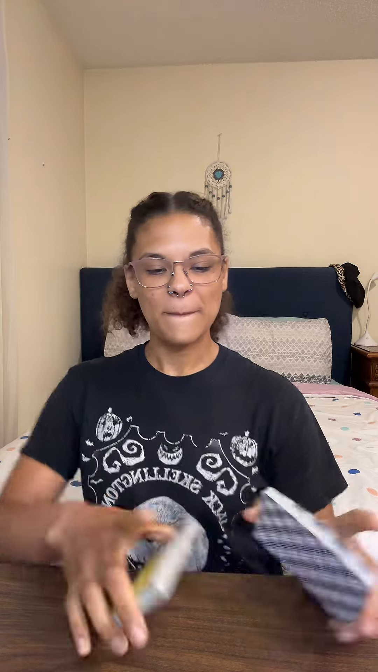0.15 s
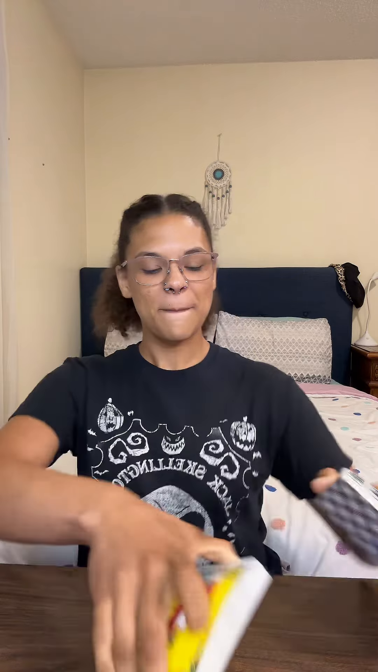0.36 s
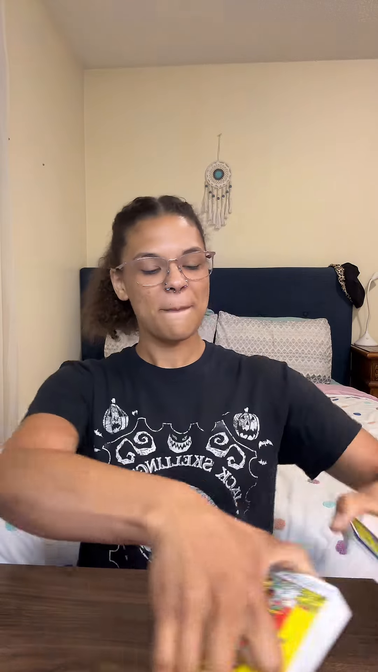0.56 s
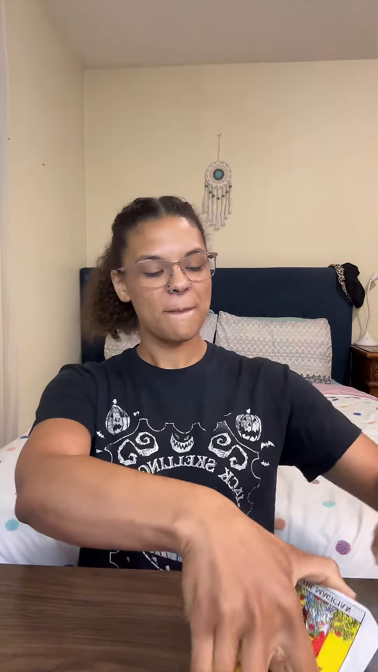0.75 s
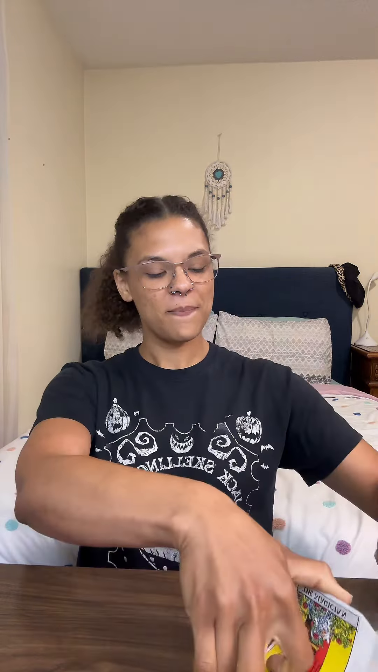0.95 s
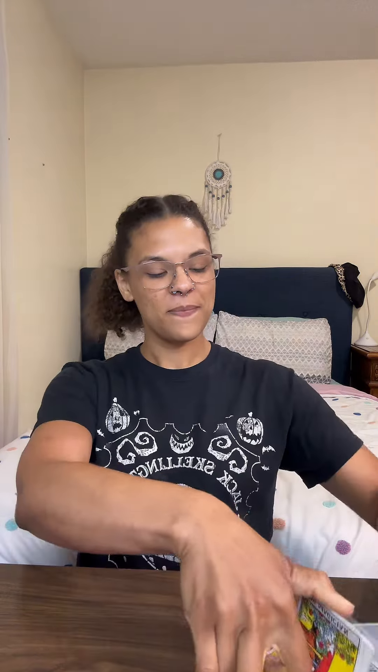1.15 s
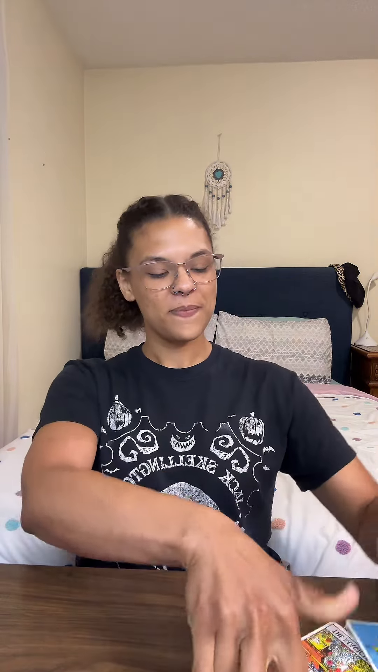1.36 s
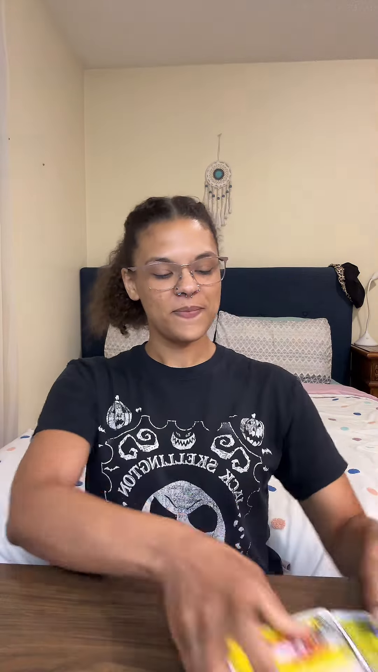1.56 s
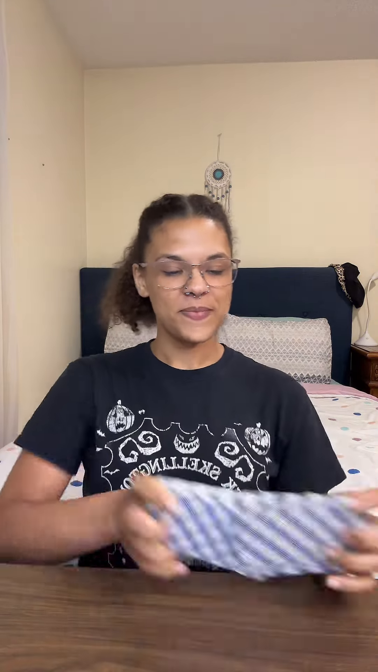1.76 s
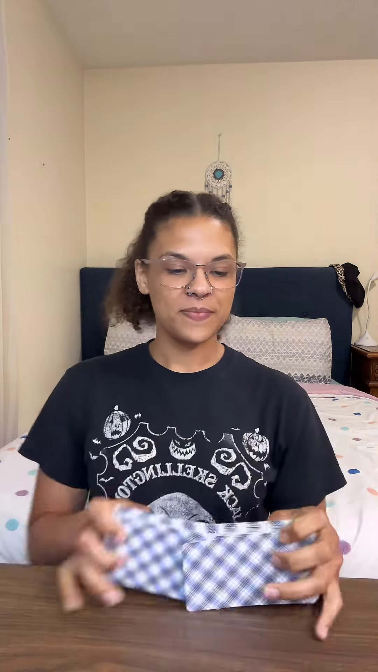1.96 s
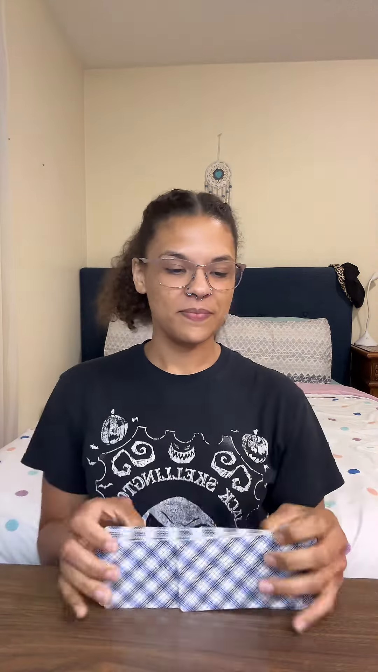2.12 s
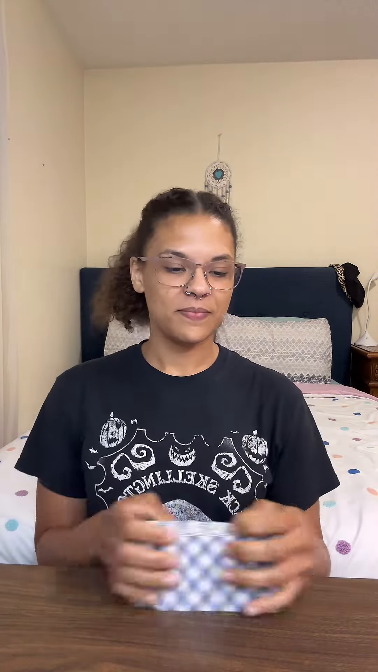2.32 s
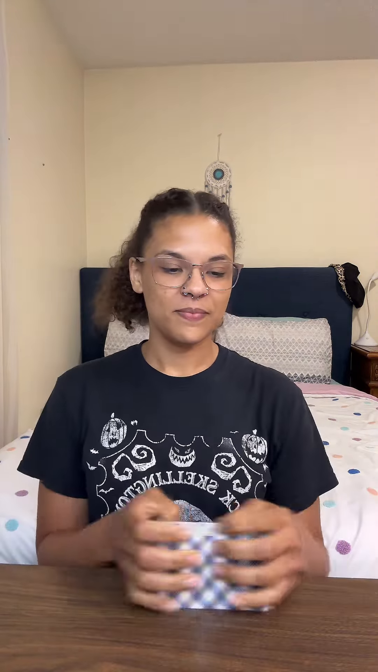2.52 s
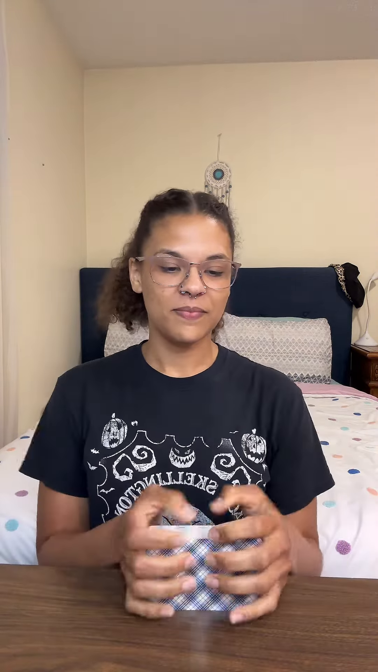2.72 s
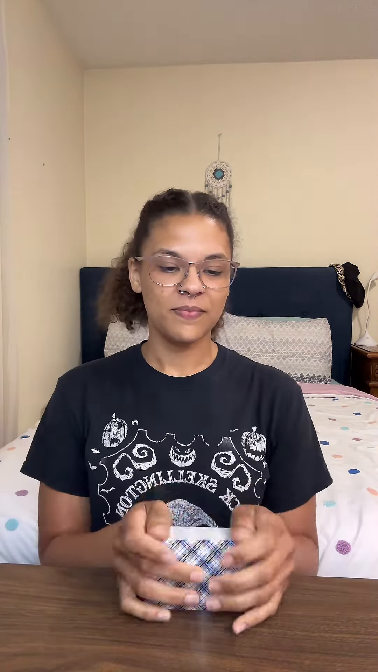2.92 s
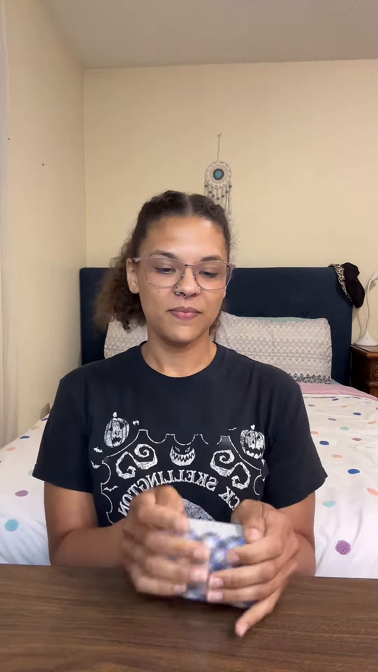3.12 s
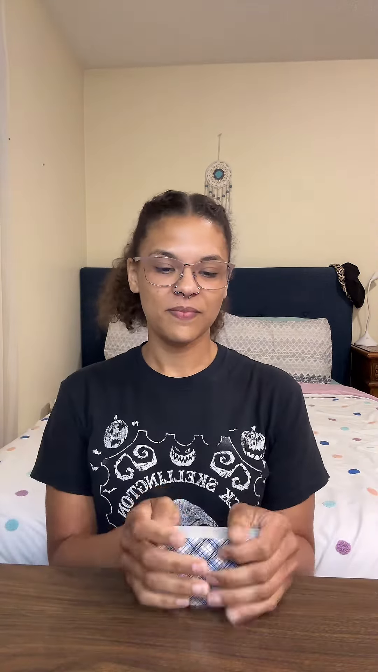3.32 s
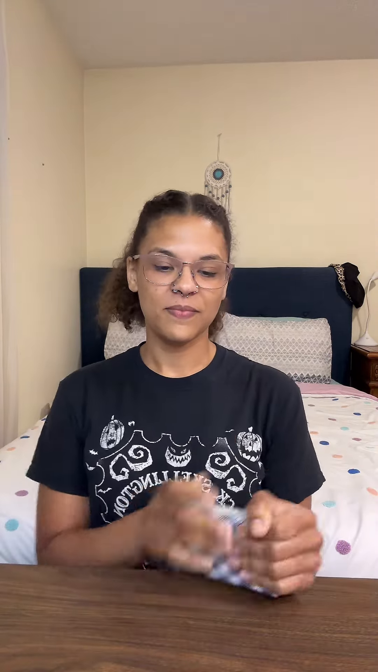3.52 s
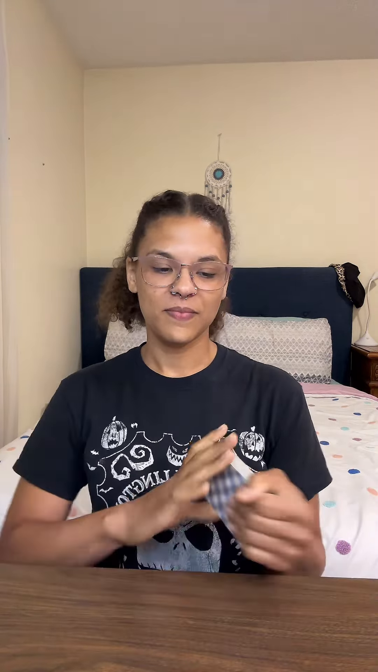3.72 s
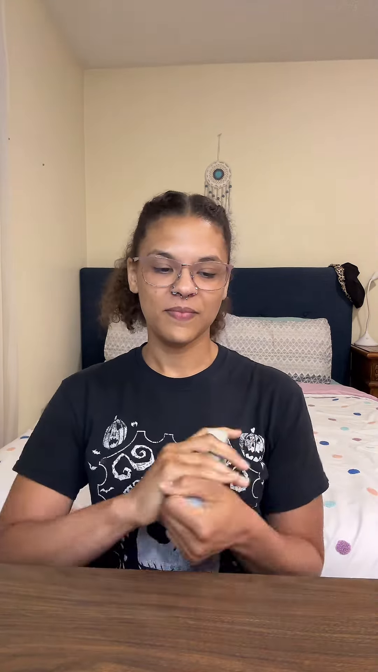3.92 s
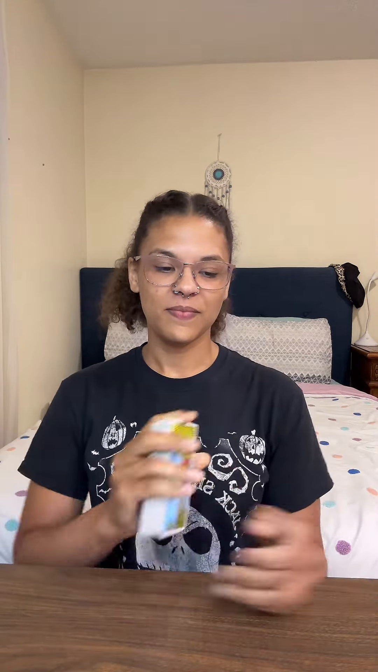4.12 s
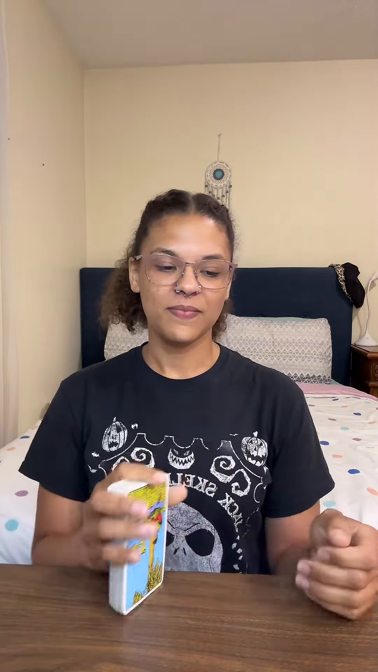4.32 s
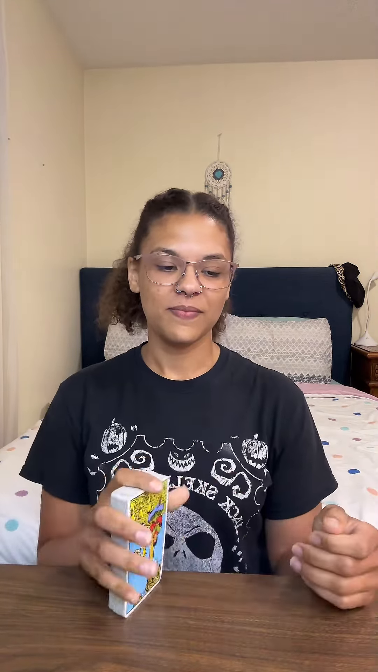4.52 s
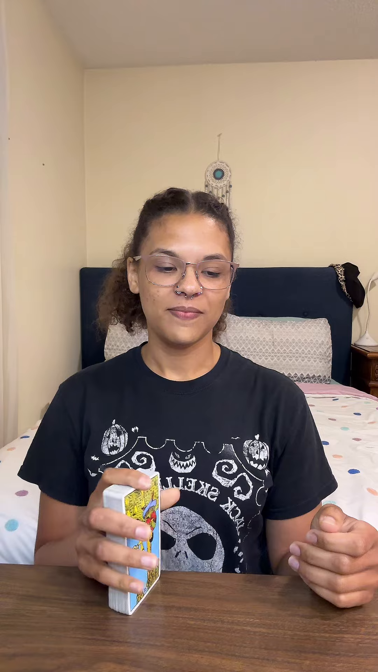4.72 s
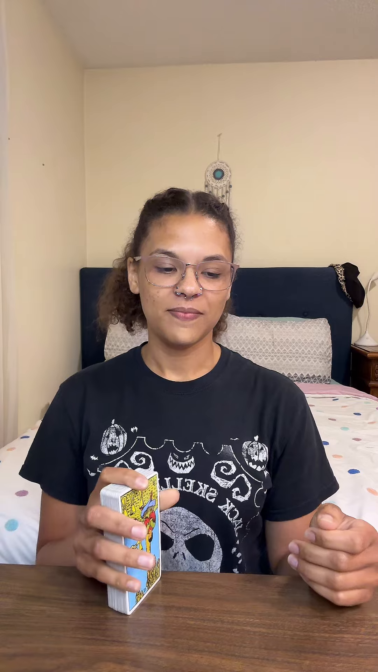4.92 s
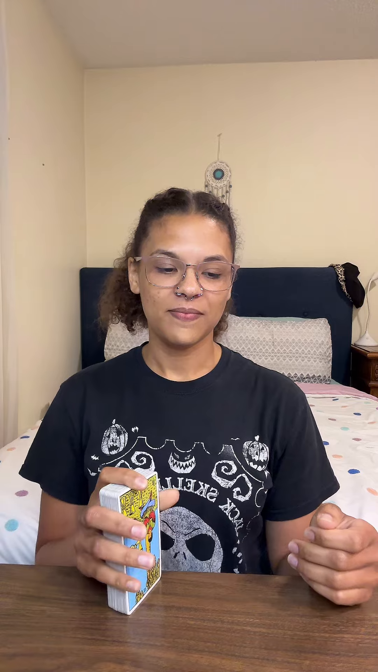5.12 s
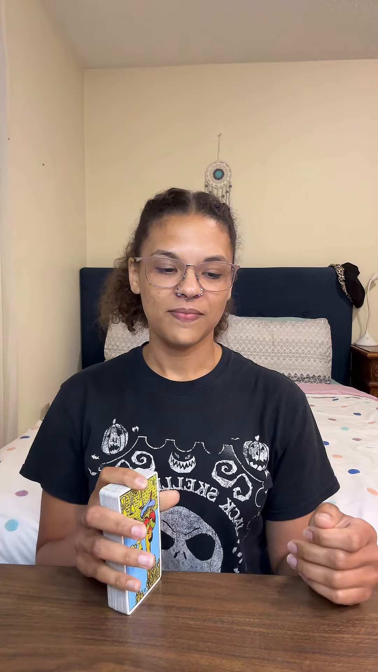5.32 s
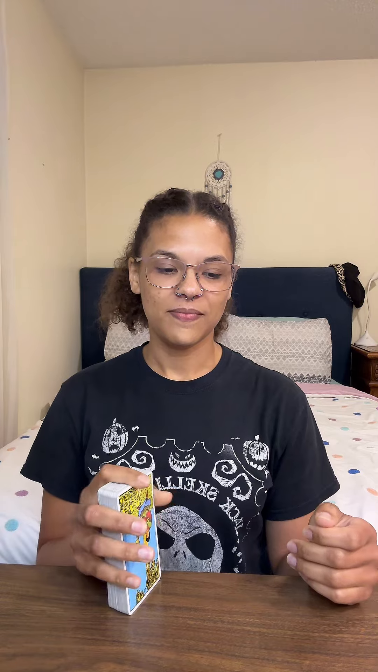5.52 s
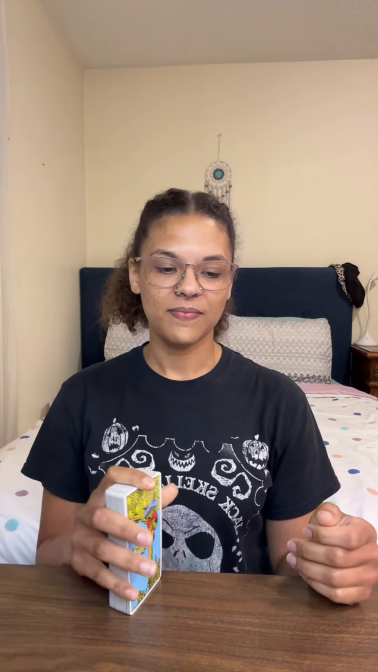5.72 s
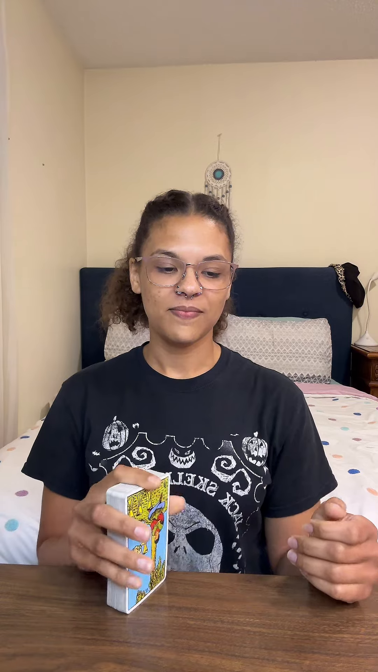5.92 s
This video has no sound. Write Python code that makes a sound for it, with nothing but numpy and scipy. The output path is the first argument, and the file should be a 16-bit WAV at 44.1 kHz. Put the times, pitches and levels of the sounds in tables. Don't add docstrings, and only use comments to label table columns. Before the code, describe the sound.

A deck of large cards is riffled in a fast crackling run, pushed together, then knocked square on a wooden table in a quiet bedroom.

```python
import sys
import numpy as np
from scipy import signal
from scipy.fft import rfft, irfft, next_fast_len
from scipy.io import wavfile
from scipy.ndimage import uniform_filter1d

SR = 44100
rng = np.random.default_rng(int(sys.argv[2]) if len(sys.argv) > 2 else 0)


def pcm_store(signal):
    levels = np.round(np.clip(np.atleast_2d(signal), -1, 1) * 32767)
    wavfile.write(sys.argv[1], SR, levels.astype(np.int16).T)


def linear_from_db(decibels):
    return 10 ** (np.asarray(decibels, float) / 20)


N = 262836


def rms_one(x):
    return x / np.sqrt(np.mean(x ** 2) + 1e-20)


def in_time(rows):
    s, *columns = np.transpose(rows)
    return [np.interp(np.arange(N) / SR, s, column) for column in columns]


def at_hz(points, hz):
    point_hz, value = np.transpose(points)
    return np.interp(np.log(hz), np.log(point_hz), value)


def drift(rate_hz):
    r = np.exp(-80 * np.pi * rate_hz / SR)
    white = rng.standard_normal(N // 40 + 2002)
    slow = signal.lfilter([1], [1, -2 * r, r * r], white)[2000:]
    return np.interp(np.arange(N) / 40, np.arange(len(slow)), rms_one(slow))


def band(x, low, high):
    return signal.sosfilt(signal.butter(2, [low, high], "band", fs=SR, output="sos"), x)


def resonate(x, modes):
    out = 0
    for k, (hz, width, level_db) in enumerate(modes):
        r = np.exp(-np.pi * width / SR)
        b = (1 - r * r) / 2 * np.array([1, 0, -1])
        a = [1, -2 * r * np.cos(2 * np.pi * hz / SR), r * r]
        out = out + (-1) ** k * linear_from_db(level_db) * signal.lfilter(b, a, x)
    return out


def coloured(x, spectrum):
    size = next_fast_len(N)
    hz = np.maximum(np.arange(size // 2 + 1) * SR / size, 1)
    inside = (hz > spectrum[0][0]) & (hz < spectrum[-1][0])
    return rms_one(irfft(rfft(x, size) * linear_from_db(at_hz(spectrum, hz)) * inside, size)[:N])


def gestures(rows, *rest_db):
    t, rows = np.arange(0, N + 32, 32) / SR, np.array(rows)
    late = t - rows[:, :1]
    rise_s, fall_s = np.abs(rows[:, 1:2]), np.abs(rows[:, 2:3])
    shape_db = -20 * np.where(late < 0, -late / rise_s, late / fall_s)
    power = linear_from_db(2 * rows[:, 3:].T) @ linear_from_db(2 * shape_db)
    power = power + linear_from_db(2 * np.array(rest_db))[:, None]
    return [np.interp(np.arange(N) / SR, t, np.sqrt(p)) for p in power]


# (frequency [Hz], level [dB per Hz])
HOUSE_AIR = [(21, -28), (35, -2.5), (91, -10), (124, -11), (217, -21), (254, -17), (393, -20.5), (434, -24),
             (904, -30.5), (1040, -31.5), (4000, -41), (5200, -79), (8800, -120)]
# (frequency [Hz], width [Hz], level [dB])
APPLIANCES = [(57.6, 3.8, -55), (121.5, 8.4, -57)]
# (time [s], level [dB])
FAR_PIPE = [
    (4.72, -91),
    (4.82, -54.5),
    (5.12, -55.5),
    (5.18, -90),
]


def house():
    air = linear_from_db(-55.5 + 0.55 * drift(11.0)) * coloured(rng.standard_normal(N), HOUSE_AIR)
    hum = 0
    for hz, width, level_db in APPLIANCES:
        hum = hum + linear_from_db(level_db) * rms_one(resonate(rng.standard_normal(N), [(hz, width, 0)]))
    pipe_hz = 269
    pipe_db, = in_time(FAR_PIPE)
    return air + hum + linear_from_db(pipe_db) * np.sin(2 * np.pi * pipe_hz * np.arange(N) / SR)


# (frequency [Hz], width [Hz], level [dB])
TABLE_MODES = [(117, 37, -1), (175, 33, -2), (229, 40, -2.5), (320.5, 33, -0.5), (404, 68, 2.5),
               (506, 88, -5.5)]
# (frequency [Hz], width [Hz], level [dB])
STACK_BODY_MODES = [(570, 270, -1), (1143, 450, 1), (1670, 260, -9.5)]
# (frequency [Hz], width [Hz], level [dB])
STACK_EDGE_MODES = [(3157, 940, 5.5), (4470, 1300, 7), (5340, 1700, 0.5)]


def slaps(rows, t60, push_t60, rise_s, click, dull_hz, fizz_hz, trim_db, card, gloss_db=-30):
    rows, t, out = np.array(rows), np.arange(3072) / SR, np.zeros(N + 3072)
    dying, push_dying = linear_from_db(-60 * t / t60), linear_from_db(-60 * t / push_t60)
    white = rng.standard_normal((len(rows), len(t))) * (1 - np.exp(-t / rise_s))
    white[:, 8] -= click
    fizz = band(band(white * dying, 5400, fizz_hz), 4300, 0.91 * fizz_hz)
    gloss = band(band(white * dying, 12300, 16500), 12000, 17000)
    fizz = fizz + linear_from_db(gloss_db) * gloss
    dull = signal.sosfilt(signal.butter(4, dull_hz, fs=SR, output="sos"), white)
    burst, push = dull * dying, dull * push_dying
    bend = 1 + 0.1 * rng.uniform(-1.1, 1, len(rows))
    ring = np.array([np.interp(t * b, t, r) for b, r in zip(bend, resonate(burst, card))])
    layers = [
        band(ring, 1100, 4200),
        band(resonate(push, TABLE_MODES), 58, 900),
        band(resonate(push, STACK_BODY_MODES), 360, 1700),
        band(band(resonate(burst, STACK_EDGE_MODES), 2700, 6200), 2400, 6600),
        fizz]
    levels = rows[:, [1, 2, 2, 3, -1]]
    total = 0
    for k, layer in enumerate(layers):
        loudest = np.sqrt(uniform_filter1d(layer ** 2, size=132).max(axis=1, keepdims=True))
        total = total + layer / loudest * linear_from_db(levels[:, k:k + 1] + trim_db[k])
    lead_s = .0005
    for s, sound in zip(rows[:, 0] - lead_s, total):
        out[round(s * SR):][:len(t)] += sound
    return out[:N]


# (frequency [Hz], width [Hz], level [dB])
FLAT_CARD_MODES = [(1150, 400, -4.5), (1680, 390, 2.5), (2900, 1100, 1), (3600, 600, -5)]
# (time [s], card ring [dB], weight [dB], edge snap [dB], fizz [dB])
FINGERS = [(.1545, -64, -55, -66, -64), (.1686, -69, -64, -72, -62), (.2286, -64, -45, -58, -64),
           (.281, -60, -50, -62, -64), (.3229, -60, -50, -58, -53), (.482, -57, -60, -62, -69),
           (.5659, -55, -56, -62, -63), (.601, -50, -48, -48, -57), (.672, -68, -56, -72, -74),
           (.8515, -64.5, -63, -68.5, -72), (1.8, -50, -58, -50, -46), (1.892, -56, -62.5, -60, -59),
           (1.96, -60, -64, -64, -61), (2.0405, -48, -55, -40, -49), (3.242, -72, -70, -74, -68),
           (1.703, -52, -58, -56, -70), (4.2, -64, -55, -70, -72), (4.2186, -62, -61, -70, -64),
           (5.4689, -67, -58, -74, -80), (5.745, -68, -58, -80, -85), (5.812, -70, -52, -80, -85)]


def handling():
    return slaps(FINGERS, t60=0.015, push_t60=0.025, rise_s=0.001, click=2.5, dull_hz=11990,
                 fizz_hz=15000, trim_db=[-5, -10, -8, -3, -4], card=FLAT_CARD_MODES)


# (delay [s], level [dB])
WALL_ECHOES = [
    (.0088, -15.5),
    (0.0163, -20),
]
# (frequency [Hz], time to fall 60 dB [s])
ROOM_DECAY = [(100, 0.36), (300, 0.32), (1000, 0.39), (3000, 0.35), (6000, 0.14), (12000, 0.06)]
# (frequency [Hz], level [dB])
ROOM_LEVEL = [(100, -3), (400, -5), (1000, -6), (2400, -13.5), (6000, -12.5), (12000, -15)]


def bedroom(x):
    t, edges = np.arange(SR // 2) / SR, 70 * 2 ** np.arange(0, 8.1, .5)
    tail = np.zeros(len(t))
    onset = 1 - np.exp(-(t / 0.0029) ** 2)
    for low, high in zip(edges, edges[1:]):
        hz = np.sqrt(low * high)
        decay = at_hz(ROOM_DECAY, hz)
        unit_energy = np.sqrt(2 * np.log(1000) / decay / SR)
        dying = rng.standard_normal(len(t)) * linear_from_db(-60 * t / decay) * unit_energy
        tail += linear_from_db(at_hz(ROOM_LEVEL, hz)) * band(dying * onset, low, high)
    echoes = np.zeros(len(t))
    for s, level_db in WALL_ECHOES:
        echoes[round(s * SR)] = linear_from_db(level_db)
    return x + signal.fftconvolve(x, tail + band(echoes, 680, 5500))[:N]


# (peak time [s], 20 dB rise [s], 20 dB fall [s], rub [dB], fine hiss [dB])
STROKES = [(.262, .1, .17, -59, -66), (.486, .03, .05, -60, -75), (.612, .02, .12, -60, -69),
           (.85, .4, .4, -71, -80), (.99, .03, .02, -59, -55), (1.625, .05, .1, -44, -59),
           (1.775, .05, .07, -47, -50), (1.812, .05, .12, -48, -51.5), (1.95, .2, .25, -62, -72),
           (2.47, .06, .2, -48, -59), (2.54, .14, .04, -44, -51), (2.612, .03, .05, -50, -66),
           (2.715, .025, .06, -46, -56), (2.742, .06, .05, -38, -53), (2.78, .05, .25, -54, -66),
           (3.14, .05, .33, -66, -74), (3.78, .35, .04, -66, -74), (4.014, .04, .4, -61.5, -77),
           (4.2, .12, .05, -70, -65), (4.325, .04, .1, -68, -65), (4.39, .1, .1, -65, -63),
           (4.435, .06, .04, -68, -65), (4.62, .04, .12, -58, -74), (5.758, .06, .05, -66, -86),
           (5.93, .3, .3, -74, -82), (2.045, .005, .06, -62, -57), (2.102, .003, .1, -40, -56),
           (3.07, .003, .06, -47, -76), (3.462, .008, .15, -34, -56), (1.035, .02, .09, -38, -42)]
# (frequency [Hz], level [dB per Hz])
RUB_SPECTRUM = [(300, -22.5), (450, -4), (874, -4.5), (1200, -5), (1700, 1), (7000, -14.5), (9100, -38.5),
                (15400, -120)]
# (frequency [Hz], level [dB per Hz])
HISS_SPECTRUM = [(2940, -43.5), (5000, -0.5), (6530, -4.5), (7670, -3.5), (9190, 1.5), (11500, -14.5),
                 (14700, -9.5), (16000, -12)]


def sliding():
    rub, hiss = gestures(STROKES, -83.5, -92)
    sizes = linear_from_db(2 * np.minimum(rng.exponential(1, (2, N)), 4))
    grain = sizes * rng.standard_normal((2, N))
    grip = linear_from_db(1.3 * drift(40))
    sheen = linear_from_db(-8.0) * rms_one(band(band(grain[0], 12300, 16500), 12000, 17000))
    rubbing = coloured(grain[0], RUB_SPECTRUM) * rub * linear_from_db(-3.0)
    hissing = (coloured(grain[1], HISS_SPECTRUM) + sheen) * hiss * linear_from_db(-2.0)
    return grip * (rubbing + hissing)


# (peak time [s], 20 dB rise [s], 20 dB fall [s], level [dB])
PRESSES = [(.27, .1, .3, -48), (1.025, .02, .06, -45), (1.53, .1, .08, -34), (1.612, .02, .1, -32),
           (2.13, .04, .2, -37), (2.175, .02, .1, -37), (2.3, .15, .22, -41), (2.36, .06, .1, -41),
           (2.49, .05, .05, -50), (2.6, .06, .08, -52), (2.77, .05, .2, -32.5), (3.46, .06, .2, -29.5),
           (3.53, .04, .08, -35), (3.62, .1, .3, -48), (4.56, .06, .15, -32), (4.63, .03, .15, -42),
           (5.2, .1, .1, -58), (5.48, .04, .05, -55), (5.78, .06, .06, -55)]
# (frequency [Hz], width [Hz], level [dB])
LEG_MODES = [(71.5, 56, -5.5)]


def hands():
    press, = gestures(PRESSES, -63)
    press = np.hypot(press, run_of_cards(-21, 0))
    shaking = rms_one(resonate(rng.standard_normal(N), LEG_MODES + TABLE_MODES[:3]))
    return shaking * press * linear_from_db(-4.0 + 1.4 * drift(22))


# (frequency [Hz], width [Hz], level [dB])
RING_TICK_MODES = [(2150, 140, 1), (4420, 300, -6.5)]


def ring_tick(t60):
    late = np.arange(N) / SR - .601
    buzz = rng.standard_normal(N) * linear_from_db(-60 * np.abs(late) / t60) * (late > 0)
    return linear_from_db(-35) * resonate(buzz, RING_TICK_MODES)


# (frequency [Hz], width [Hz], level [dB])
BENT_CARD_MODES = [(1711, 190, -1.5), (2330, 140, 5.5), (2820, 240, -1), (3380, 390, -6)]
# (time [s], card ring [dB], weight [dB], edge snap [dB], fizz [dB])
FIRST_CARDS = [(0.9966, -43, -40.5, -32.5, -31.5), (1.0011, -39, -44, -36, -38.0),
               (1.014, -46, -48, -45, -38.0), (1.0176, -27, -30, -15.5, -19),
               (1.0221, -30, -24.5, -30, -33.0), (1.0262, -25.5, -35, -33, -39),
               (1.0496, -34.5, -39, -33, -34.5), (1.0797, -28.5, -32.5, -31.5, -40.0),
               (1.0828, -36.5, -32, -35.5, -42), (1.1069, -26.5, -30.5, -27.5, -34),
               (1.1151, -38.5, -52.5, -34, -36), (1.1296, -30.5, -44, -25.5, -35.0),
               (1.1325, -17.5, -22, -17, -27.5), (1.1414, -21.5, -30.5, -27, -28.5),
               (1.1492, -27.5, -32.5, -26.5, -32.5), (1.1713, -27.5, -23.5, -29, -34.5),
               (1.1828, -19.0, -24, -31.5, -29.5), (1.1941, -19.5, -18.5, -24.5, -28.5),
               (1.2083, -22.0, -35, -30, -30), (1.2158, -27.5, -34, -33, -32.5),
               (1.2218, -20, -22.5, -19.5, -29.5), (1.2269, -19.5, -28.5, -26.5, -34.5),
               (1.2375, -27.5, -26.5, -31.5, -32.0), (1.2491, -11, -20, -25, -28.5),
               (1.2494, -18, -21.5, -26, -27.5), (1.2542, -21, -39.5, -29.5, -29.5),
               (1.2709, -28.5, -34.5, -36, -39), (1.2791, -37.5, -31.5, -38.5, -35.0),
               (1.287, -18.5, -15.5, -16.5, -27.0), (1.297, -17.5, -28, -17, -22.5),
               (1.3027, -18, -21.5, -21.5, -29.0), (1.3142, -30.5, -31.5, -25, -40),
               (1.3168, -32, -37, -27.5, -33.5), (1.3332, -24.5, -34.5, -32.5, -39),
               (1.3384, -25.5, -26.5, -26, -32), (1.3421, -29, -20, -21.5, -35.0),
               (1.3588, -22, -18.5, -21, -33.5), (1.3652, -33.5, -32, -35.5, -32.0),
               (1.3697, -30, -26.5, -23, -31.5), (1.3961, -22, -30, -32, -39.5)]
# (time [s], card ring [dB], weight [dB], edge snap [dB], fizz [dB])
LAST_CARDS = [(1.415, -25.5, -20.5, -31, -39.5), (1.4311, -26, -32.5, -35.5, -43),
              (1.4387, -26.5, -16.5, -35, -40.0), (1.4448, -16.5, -17, -30, -34.5),
              (1.4463, -24.5, -26, -37, -39.0), (1.4519, -28, -35.5, -25, -26.5),
              (1.454, -21, -27, -40.5, -34), (1.4614, -20, -26.5, -38, -33), (1.4696, -23.5, -26, -31, -37),
              (1.4742, -32, -16.5, -29, -35), (1.4774, -22, -28, -27, -33), (1.4876, -21, -19, -36, -21),
              (1.4943, -17.5, -29.5, -34, -34), (1.4991, -23.5, -27, -28.5, -33),
              (1.5056, -27, -19, -30.0, -34.5), (1.5103, -14.5, -19.5, -33, -29.5),
              (1.5127, -25, -26, -29.5, -40.5), (1.5213, -16.5, -21, -31, -39.0),
              (1.5251, -17.5, -25, -16.5, -27.5), (1.5302, -33, -40.5, -33.5, -42.5),
              (1.5367, -25.5, -40, -35.5, -40.5), (1.5548, -20, -26, -23, -32.5),
              (1.5852, -34, -44, -24.5, -40), (1.5987, -22.5, -26.5, -31.0, -35.5)]


def riffle():
    first = slaps(FIRST_CARDS, t60=0.015, push_t60=0.0059, rise_s=0.0003, click=8.0, dull_hz=17000,
                  fizz_hz=16600, trim_db=[-2.5, -8.0, -3.0, -1.5, 0.5], card=BENT_CARD_MODES)
    last = slaps(LAST_CARDS, t60=0.015, push_t60=0.011, rise_s=0.0003597, click=7.2, dull_hz=9000,
                 fizz_hz=10200, trim_db=[-3.0, -8.0, -3.5, -6.0, -1.5], card=BENT_CARD_MODES, gloss_db=-3.0)
    return first + last


# (time [s], level [dB])
CARD_RUN = [(1.0, -45), (1.125, -43), (1.151, -31), (1.363, -22.5), (1.407, -32), (1.457, -21.5),
            (1.507, -22), (1.56, -29), (1.61, -33), (1.72, -59.5)]


def run_of_cards(offset_db, db_per_s):
    t, (run_db,) = np.arange(N) / SR, in_time(CARD_RUN)
    since = t - CARD_RUN[0][0]
    running = (since > 0) * (t < CARD_RUN[-1][0])
    return uniform_filter1d(linear_from_db(run_db + offset_db + db_per_s * since) * running, size=220)


# (time [s], 20 dB fall [s], flutter [dB], fine hiss [dB])
LOOSE_BURSTS = [
    (0.997, 0.48, -32.5, -40.5),
    (1.017, -0.01, -19.5, -23.5),
    (1.132, 0.0881, -16.5, -29),
    (2.099, -0.35, -45.5, -57.5),
    (2.2213, 0.1068, -20, -43),
    (2.261, 0.12, -26.5, -54),
    (2.289, 0.1362, -34.5, -58),
    (3.451, -0.0084, -14, -42),
    (3.466, 0.1238, -34, -57),
]


def flutter(per_s):
    rise_s = .002
    ticks, hiss = gestures([(s, rise_s, *rest) for s, *rest in LOOSE_BURSTS], -120, -120)
    ticks = np.hypot(ticks, run_of_cards(0, 0))
    hiss = np.hypot(hiss, run_of_cards(-5.5, -20))
    sizes = linear_from_db(2.5 * np.minimum(rng.exponential(1, N), 4)) * rng.choice([-1, 1], N)
    clicks = sizes * (rng.random(N) < per_s / SR) + 1e-18
    bent = np.arange(N) < 1.6 * SR
    ringing = resonate(clicks * bent, BENT_CARD_MODES)
    ringing = ringing + linear_from_db(-3.0) * resonate(clicks * ~bent, FLAT_CARD_MODES)
    ringing = ringing + linear_from_db(-8.5) * band(clicks, 3000, 7500)
    ringing = ringing + linear_from_db(-3.5) * resonate(clicks, STACK_BODY_MODES)
    air = coloured(rng.standard_normal(N) + 0.27 * rms_one(clicks), HISS_SPECTRUM)
    air += linear_from_db(-5.0) * rms_one(band(rng.standard_normal(N), 5500, 21000))
    return rms_one(band(ringing, 270, 7100)) * ticks * linear_from_db(-7.0) + air * hiss * linear_from_db(-3.5)


# (frequency [Hz], level [dB])
LEFT_SPOT = [(183, -34.5), (410, -40), (560, -31.5), (700, -28.5), (926, -26.5), (1050, -22), (1285, -24),
             (1785, -29.5), (2390, -22.5)]
# (frequency [Hz], level [dB])
MIDDLE_SPOT = [(124, -32.5), (180, -30), (235, -28), (280, -26), (320, -26), (400, -27), (560, -31.5),
               (830, -33), (1085, -24), (1292, -24.5), (1800, -25.5)]
# (frequency [Hz], level [dB])
RIGHT_SPOT = [(185, -26.5), (235, -27.5), (400, -30), (600, -27.5), (720, -21), (830, -27), (1040, -24),
              (1240, -21.5), (1790, -19.5), (2380, -14)]
# (time [s], level [dB], contact length [s], spot [0 left, 1 middle, 2 right])
TOP_CONTACTS = [(2.095, -6, 0.0066, 0), (2.103, 2.5, 0.002, 0), (2.11, 1.5, 0.003, 0),
                (2.127, -3.5, 0.0028, 0), (3.4154, -0.5, 0.0023, 1), (3.424, -5.5, 0.0029, 1),
                (3.449, -2, .002, 1), (3.465, -9.5, 0.0034, 1), (4.511, 1, 0.002, 2),
                (4.516, -7, 0.0026, 2), (4.537, -12, 0.0028, 2)]


def table_top():
    out, t = np.zeros(N + SR), np.arange(SR // 2) / SR
    cycles = 30
    for s, level_db, length, spot in TOP_CONTACTS:
        modes = [LEFT_SPOT, MIDDLE_SPOT, RIGHT_SPOT][round(spot)]
        hz, db = np.repeat(modes, 2, axis=0).T[:, :, None]
        strength, phase, split = rng.standard_normal((3, len(hz), 1))
        hz = hz * (1 + .05 * split)
        ring = linear_from_db(db + 2 * strength - 60 * t * hz / cycles) * np.sin(2 * np.pi * hz * t + phase)
        onset = 1 - np.exp(-(t / length * 2) ** 2)
        out[round(s * SR):][:len(t)] += linear_from_db(level_db - 2.0) * ring.sum(axis=0) * onset
    return out[:N]


# (time [s], card ring [dB], weight [dB], edge snap [dB], fizz [dB])
CORNER_KNOCKS = [
    (2.0973, -24.5, -26.5, -26, -42.5),
    (3.4156, -24, -26.5, -31, -47.5),
    (4.5108, -30, -25.5, -37, -45.5),
    (4.5127, -30, -21, -38, -50),
]


def knocks():
    return slaps(CORNER_KNOCKS, t60=0.014, push_t60=0.069, rise_s=0.0019, click=1.7, dull_hz=4170,
                 fizz_hz=11000, trim_db=[-3.0, -4.0, 0.5, -9.0, -11.5], card=FLAT_CARD_MODES)


# (time [s], card ring [dB], weight [dB], edge snap [dB], fizz [dB])
PUSHED_CARDS = [(2.219, -20.5, -33, -18, -44), (2.2207, -22, -30, -11.5, -38),
                (2.2222, -34, -30.5, -13.5, -36), (2.2252, -20, -33, -26, -29),
                (2.2467, -34, -24.5, -37, -50), (2.2562, -28, -29, -29, -48),
                (2.2604, -22, -37, -17.5, -20), (2.2637, -19, -28.5, -21.5, -42.0),
                (2.271, -24, -27.5, -21, -43), (2.2908, -30, -30, -17.5, -25), (2.2973, -23, -32, -24, -44),
                (2.3025, -42, -45, -21.5, -38), (2.3052, -31, -25.5, -24, -28),
                (2.3116, -21.5, -29.5, -20, -37), (2.3199, -30, -35, -36, -39.0),
                (2.3345, -23.5, -35, -27, -55), (2.4452, -40, -42, -49, -66.0), (2.454, -36, -41, -38, -68),
                (2.4697, -28.5, -31, -25, -64), (2.4955, -32.5, -49, -41, -50),
                (2.5167, -29, -41, -33, -42), (2.6151, -37, -36, -37, -62), (2.704, -41, -42, -56, -64.0),
                (2.7184, -35, -36, -34, -66), (2.7245, -46, -42, -35, -62), (2.7283, -38, -30.5, -48, -60),
                (2.7425, -31, -47, -33.5, -58), (2.7454, -22.5, -26, -27, -60),
                (2.8176, -40, -37, -36, -66), (2.8355, -41.5, -47, -61.5, -78),
                (3.0648, -43, -38, -41, -74.5), (3.0715, -44.5, -38.5, -46, -77.5),
                (3.0765, -38, -42, -47, -77.5), (3.0797, -38, -38, -42.5, -74.5),
                (2.1005, -33.5, -34.5, -32.5, -58)]


def squaring():
    return slaps(PUSHED_CARDS, t60=0.016, push_t60=0.031, rise_s=0.00048, click=5.5, dull_hz=6600,
                 fizz_hz=8603, trim_db=[0.0, -7.5, -2.5, -0.5, -5.0], card=FLAT_CARD_MODES)


# (time [s], card ring [dB], weight [dB], edge snap [dB], fizz [dB])
FLUSH_CARDS = [(3.4483, -13, -21.5, -4.5, -27.5), (3.4515, -13, -17, -17, -29),
               (3.4605, -28, -25.5, -28, -31.5), (3.7212, -52.5, -54, -61, -53.5),
               (3.7353, -55.5, -57.5, -63, -66), (4.55, -29, -33, -20, -55), (4.552, -17, -32, -27, -50),
               (4.5584, -20, -36, -36, -60), (4.561, -23, -32, -32, -61), (4.567, -29, -35, -30, -62)]


def settling():
    return slaps(FLUSH_CARDS, t60=0.013, push_t60=0.028, rise_s=0.00023, click=6.0, dull_hz=5130,
                 fizz_hz=8600, trim_db=[-2.5, -7.5, -2.5, -5.0, -2.0], card=FLAT_CARD_MODES)


# (peak time [s], 20 dB rise [s], 20 dB fall [s], level [dB])
THUMB_CREAKS = [(4.075, .02, .06, -67), (4.15, .04, .03, -71), (4.18, .02, .03, -70), (4.33, .03, .03, -73)]
# (frequency [Hz], width [Hz], level [dB])
CREAK_MODES = [(1620, 150, 0), (2500, 300, -7)]


def creak():
    gain, = gestures(THUMB_CREAKS, -120)
    return gain * rms_one(resonate(rng.standard_normal(N) ** 3, CREAK_MODES))


def scene():
    cards = handling() + riffle() + knocks() + squaring() + settling()
    close = sliding() + hands() + ring_tick(t60=0.23) + flutter(per_s=2300) + creak()
    return (bedroom(cards + table_top()) + close + house())[None]


def band_limit(x):
    return signal.sosfilt(signal.butter(12, 16100, fs=SR, output="sos"), x)


# (frequency [Hz], level [dB per Hz])
CAPSULE_HISS = [(2350, -34), (4000, -5.5), (4340, -2.5), (7390, -6.5), (10600, -21.5), (13300, -7),
                (15000, -15), (16200, -20.5)]


def record(dry):
    hiss = linear_from_db(-77.96) * coloured(rng.standard_normal(N), CAPSULE_HISS)
    headroom = linear_from_db(4.5)
    rounded = headroom * np.tanh(dry / headroom) + hiss
    low_cut = signal.sosfilt(signal.butter(4, 47, "high", fs=SR, output="sos"), rounded)
    mix = signal.sosfilt(signal.cheby2(12, 70, 17000, fs=SR, output="sos"), low_cut)
    return band_limit(mix)


dry = scene()
out = record(dry)
pcm_store(out)
```